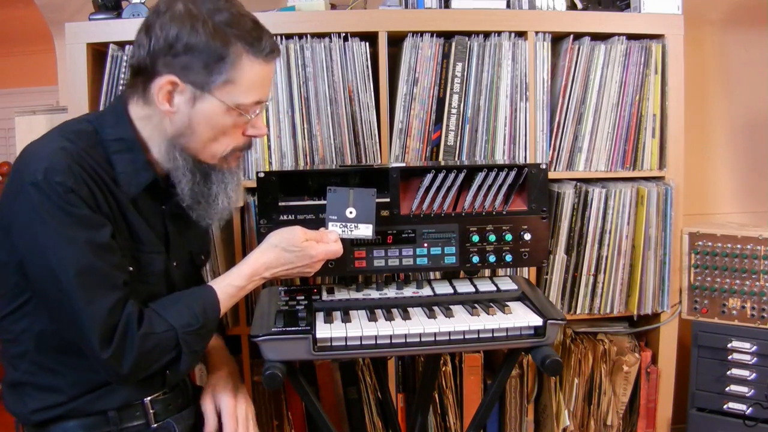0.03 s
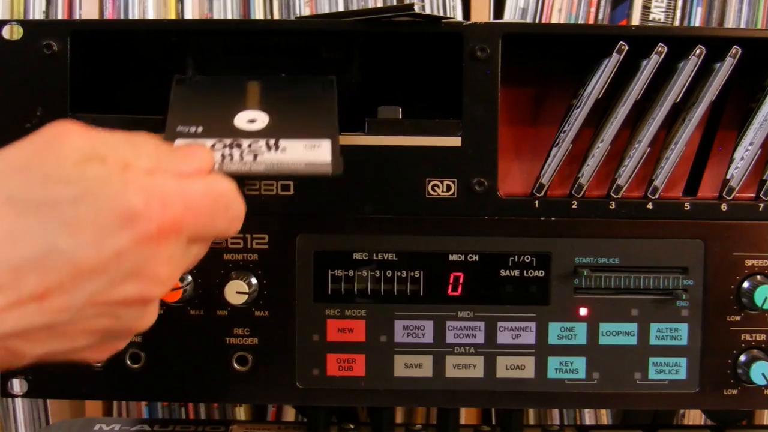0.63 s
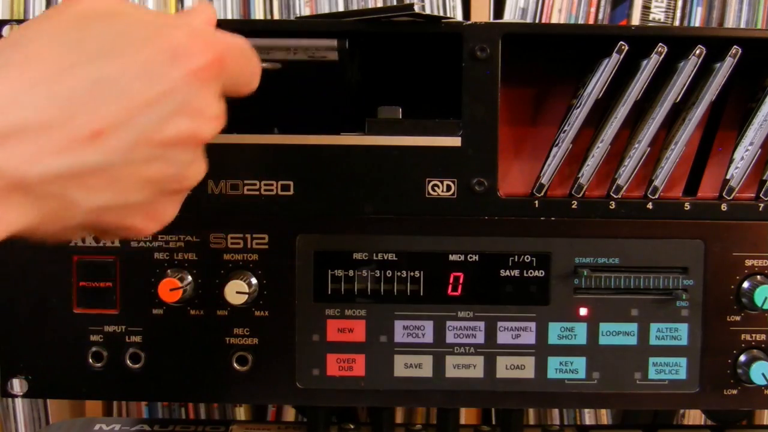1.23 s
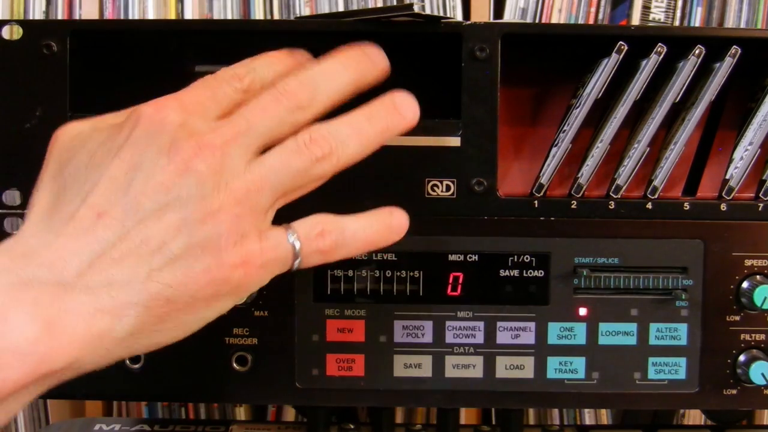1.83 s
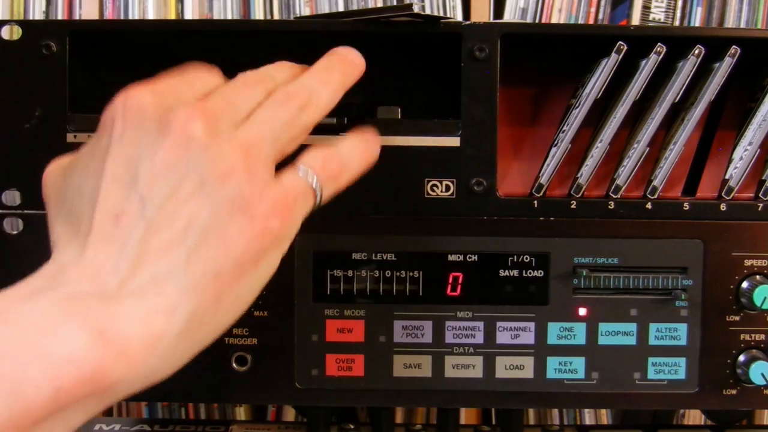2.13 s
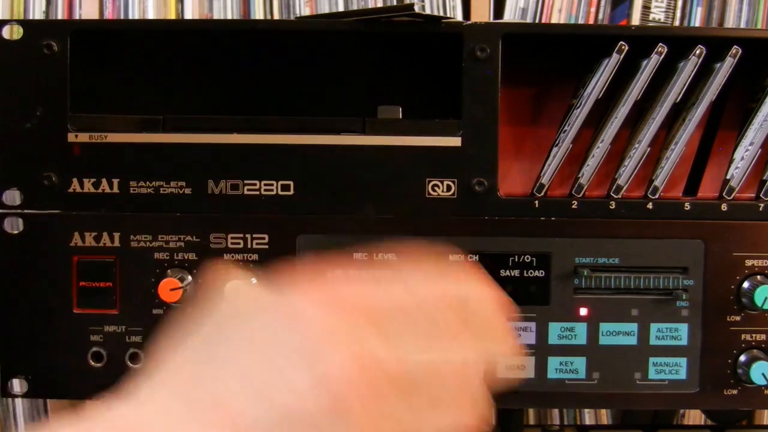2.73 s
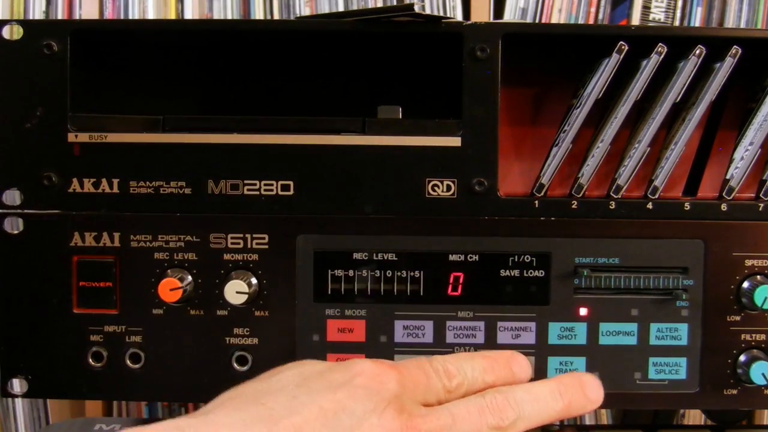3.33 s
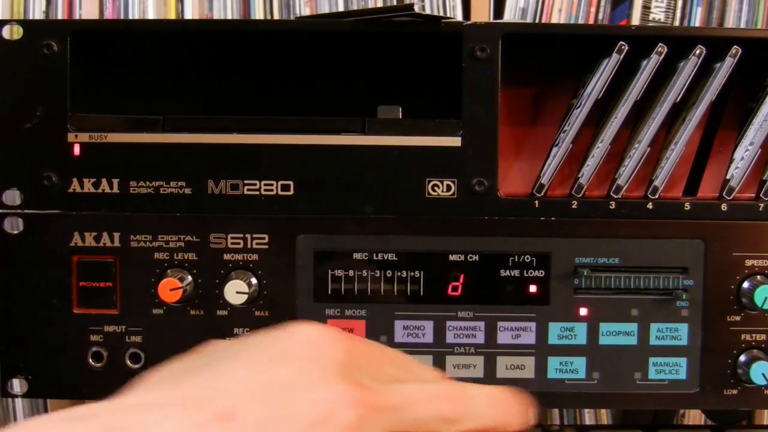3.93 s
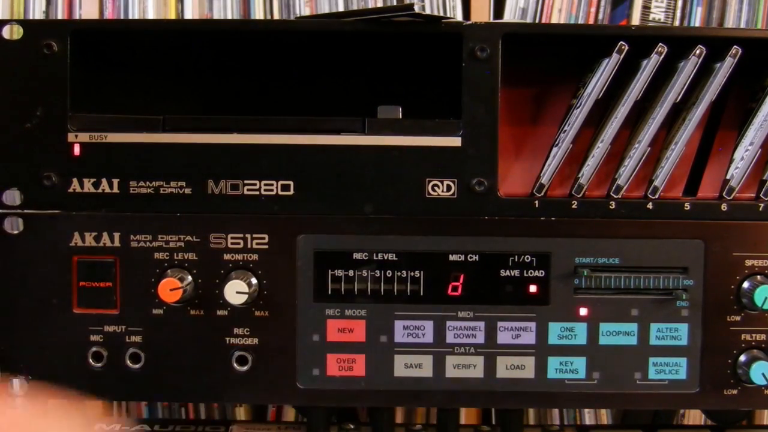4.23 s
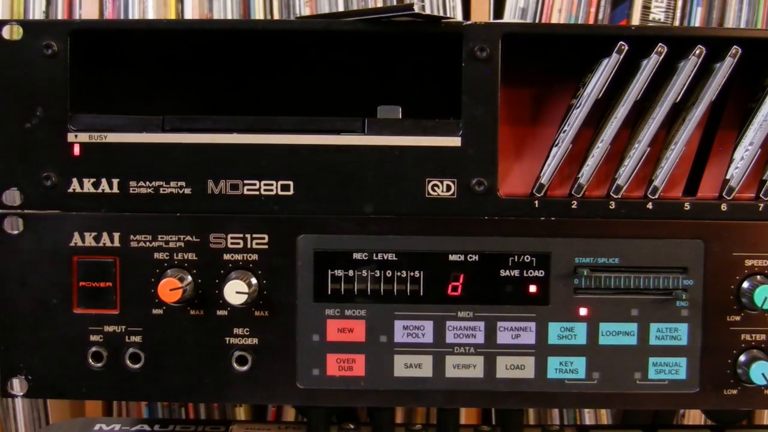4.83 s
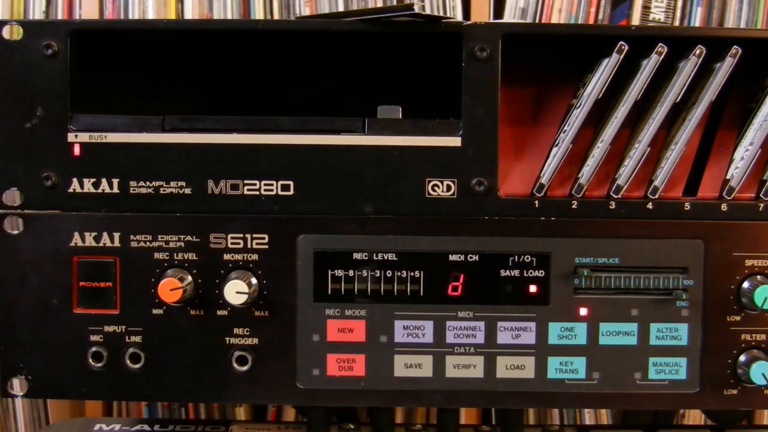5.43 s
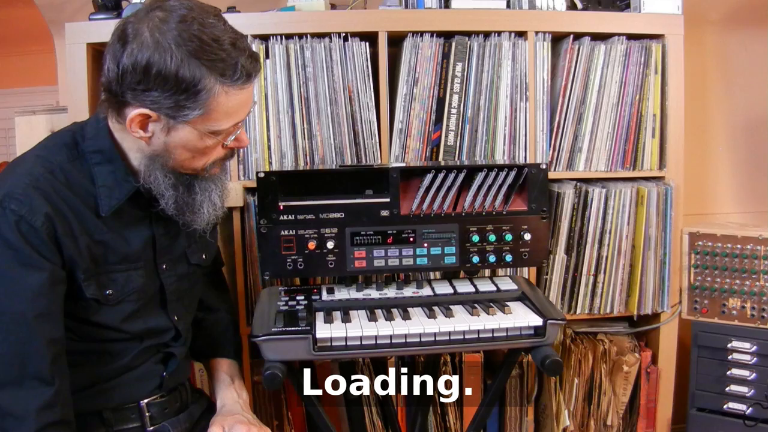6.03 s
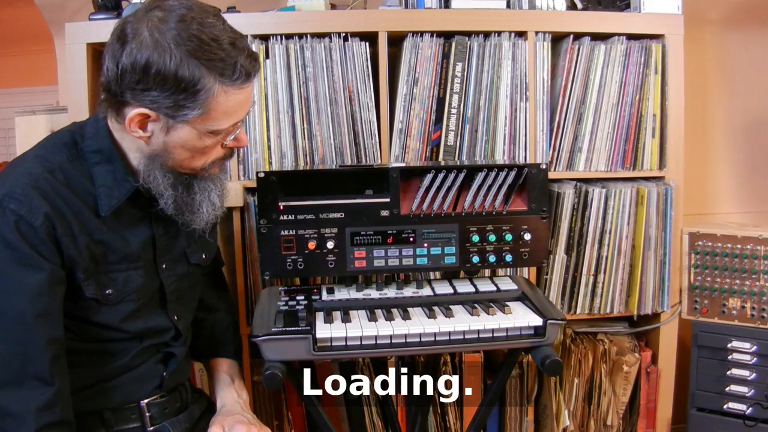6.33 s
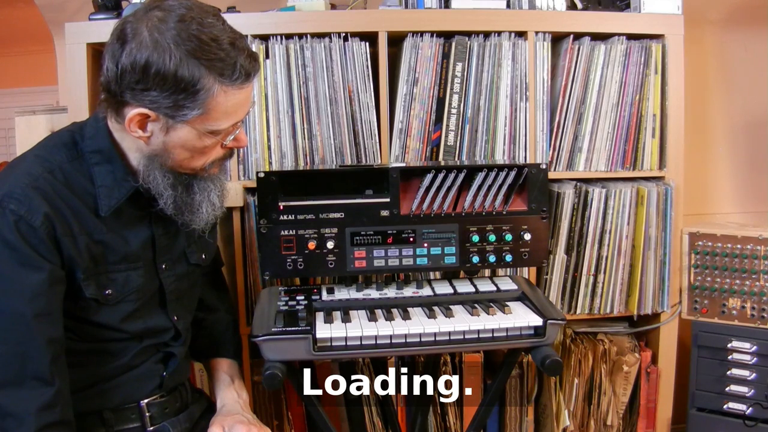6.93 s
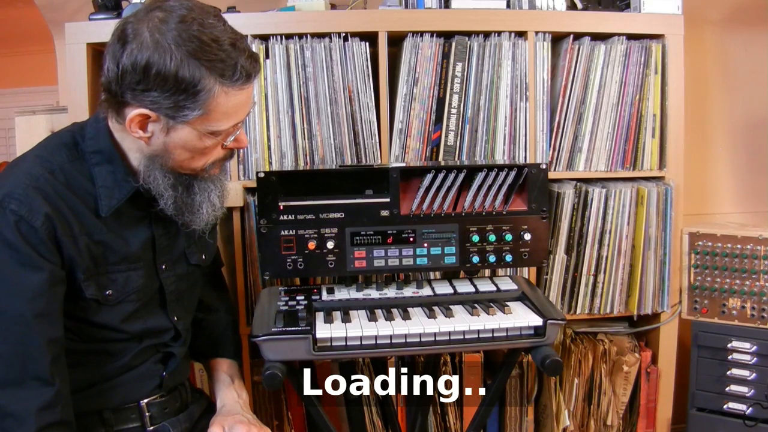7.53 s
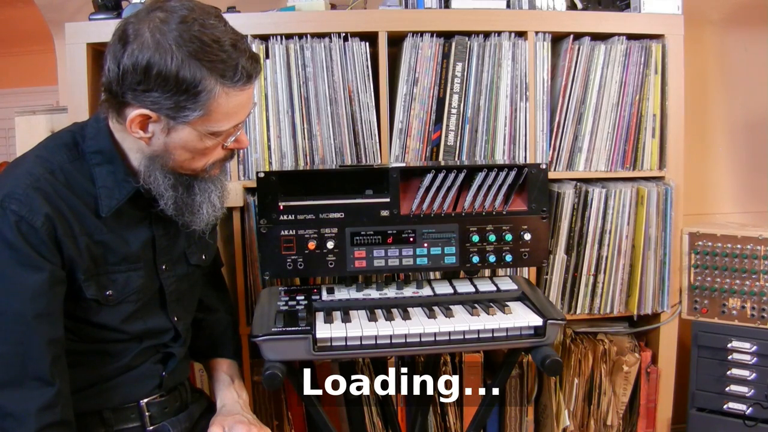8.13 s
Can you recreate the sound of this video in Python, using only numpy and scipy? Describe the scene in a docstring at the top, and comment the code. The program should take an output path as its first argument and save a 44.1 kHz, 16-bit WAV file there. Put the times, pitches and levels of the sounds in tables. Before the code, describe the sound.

A sleeve rustles softly in a quiet, dry room with a low rumble. From about 0.9 seconds a small plastic disk knocks into a drive, scraping briefly along its guides until 1.5, then is nudged home with light taps until 2. Each knock rings faintly in the steel case. The lid rattles against its latch and shuts at 2.4 with a sharp, bright snap, the loudest sound. A button clicks at about 3.4. At 3.6 the mechanism engages with a knock and a faint belt squeak, and a small motor starts a steady, slightly fluttering whine and whir. Light ticks come between 4.4 and 5.1, then one heavy clack at 5.4. After it the whine is stronger and runs on to the end at about 8 seconds, with the low rumble swelling a little underneath.

```python
"""Disk loaded into a rack drive.

A small plastic disk slides in and is nudged home; the lid snaps shut. Each hit rings the steel case.
A key clicks; the belt-driven motor starts with a squeak and whirs on, with ticks and one heavy clack.
A sleeve rustles. Quiet, dry room with a low rumble; one microphone, gain control."""
import sys
import numpy as np
from scipy import signal
from scipy.fft import rfft, irfft
from scipy.io import wavfile

SR = 44100
rng = np.random.default_rng(int(sys.argv[2]) if len(sys.argv) > 2 else 0)


def wrap_up_sound(samples):
    """Save the sound to the file named by the first command line argument, as 16-bit audio."""
    columns = np.atleast_2d(samples).T
    # keep every value between -1 and 1, then stretch to whole-number steps
    tamed = np.clip(columns, -1, 1)
    steps = np.round(tamed * 32767).astype(np.int16)
    wavfile.write(sys.argv[1], SR, steps)


N = 360297
T = np.arange(N) / SR

# Hit tables: weight adds low thud, edge adds top snap, both re level.
# disk knocks into the slot, nudged home: t/s, level/dB, weight/dB, edge/dB, part f/Hz, thud f/Hz
DISK_HITS = [ (0.426, -60.5, 0, 0.5, 1490, 303), (0.885, -45, 4.5, -23, 2370, 324),
             (1.036, -41.5, 4, -10.5, 2410, 295.6), (1.099, -47.5, 3, -12, 2040, 474),
             (1.123, -47, 11.5, -12, 1360, 462), (1.161, -48.5, 11.5, -6, 2100, 346),
             (1.185, -40.5, 0.5, -24, 2650, 320.5), (1.300, -54, -3, 9, 4370, 243),
             (1.310, -36, -13, -11, 2370, 370), (1.326, -37.5, 2, -20, 2610, 355),
             (1.354, -37.5, -16, -7, 2890, 336), (1.371, -42.5, 4.5, -0.5, 3400, 269),
             (1.387, -43.5, 5.5, -7, 2310, 362), (1.423, -40, -1.5, -4, 2710, 302),
             (1.629, -53.5, 4, -6, 5430, 302), (1.655, -42.5, 3, -7.5, 1316, 324),
             (1.672, -43.5, 6, -11, 1597, 309), (1.784, -42.5, 8.5, -2.5, 2080, 307),
             (1.899, -44, 6.5, -6, 2340, 296), (1.990, -45, 0.5, 2.5, 2090, 302.3),
             (2.019, -46, 5, -2.5, 2690, 315)]
# lid meets latch, shuts, settles: t/s, level/dB, weight/dB, edge/dB, part f/Hz, rattle t60/s
LATCH_HITS = [ (2.323, -56.5, -9, -4, 3180, 0.056), (2.339, -45.5, -13, 1, 3090, .07),
              (2.347, -33.5, -9.5, -4, 2740, .045), (2.356, -43.5, 1, -20, 1480, 0.072),
              (2.416, -46.5, -1, -3, 4700, 0.069), (2.432, -22, -11, -2, 5030, .12),
              (2.594, -48, 5.5, -10, 2360, 0.3)]
# key pressed, then released: t/s, level/dB, weight/dB, edge/dB, part f/Hz, rattle t60/s
KEY_HITS = [(3.228, -52, -7, -16, 1640, 0.018), (3.408, -42.5, -9.5, -9, 3770, 0.077)]
# mechanism engages, shifts: t/s, level/dB, weight/dB, edge/dB, part f/Hz, thud f/Hz
MECHANISM_HITS = [ (3.577, -42, -3.5, -11, 2760, 480), (4.446, -41, -3, -17, 1980, 317),
                  (4.467, -42.5, -0.5, -14, 1740, 252), (4.758, -47.5, 1.5, -7, 1780, 309),
                  (5.025, -44.5, -2.5, -15, 1730, 320), (5.062, -43, -14, -8, 2220, 300),
                  (5.137, -57, 12.5, -18, 1313, 290), (5.397, -30.5, 4.5, -7, 1600, 236),
                  (5.418, -35.5, -7, -15, 1680, 232), (6.035, -57, 2, -6, 1400, 257.8)]
# modes of steel case and lid, unmuted: f/Hz, energy/dB, t60/s
CASE_MODES = [(154.4, -27.5, 1.3), (240.5, -18, 0.37), (300, -9.5, 0.12), (359, -17.5, 0.2),
              (481.3, -21.5, 0.3), (600, -19, 0.27), (886.4, -12, 0.11), (1123, -18.5, 0.11),
              (1580, -36, 0.22), (1656, -51, 0.19), (2066, -11.5, 0.14), (2251, -9, 0.12),
              (2534, -18, 0.048), (2970, -48, 0.2), (4430, -32, 0.12), (4700, -23, .15), (4980, -18, 0.13),
              (4880, -17.5, 0.052), (7070, -24, .2), (7370, -23, 0.21)]
# edges of the thud, knock, clack and snap bands: f/Hz
HIT_BANDS_HZ = [130, 400, 1500, 6000, 16000]
# motor spins up, runs, drags the mechanism, runs free:
# start t/s, whine f/Hz, whine level/dB, flutter/dB, drone level/dB, whir level/dB, belt f/Hz
MOTOR_STAGES = [ (3.579, 902, -55.5, 5, -49.5, -49.5, 1730), (3.74, 893.6, -52.5, 4, -57, -50, 1344),
                (4.45, 885, -62.5, 5.5, -55, -49, 1345), (5.47, 884.3, -46.5, 2.2, -51, -50, 1413)]
# gear and belt tones at nominal speed: f/Hz, level/dB re whine
GEAR_TONES = [(479, -9.5), (549, -20), (732, -31), (770, -34), (1287, -28), (1367, -11), (1421, -17.5),
              (1453, -20), (1658, -22), (1764, -19.5)]
# disk in its guides: t/s, rub level/dB, scratch level/dB
SLIDE_LEVELS = [(1.04, -53, -52), (1.07, -40, -48), (1.11, -44, -53), (1.135, -33, -48), (1.19, -45, -59),
                (1.26, -40.5, -48), (1.32, -44.5, -44), (1.42, -44, -54), (1.49, -60, -80)]
# arm moves: middle t/s, length/s, level/dB
SLEEVE_MOVES = [(0.03, 0.67, -52.5), (.38, 0.28, -52), (1.3, 2.1, -62), (2.173, 0.38, -52.5),
                (2.9, 0.81, -54.5), (4.5, 1.18, -51)]
# noise shapes: f/Hz, relative density/dB
RATTLE_SPECTRUM = [(100, 1.5), (300, -28), (420, -5), (1000, -6), (2800, 0.5), (5000, -6.5), (7000, -14),
                   (10000, -16), (13000, -17.5), (16000, -29)]
DRONE_SPECTRUM = [(60, -16), (110, -9.5), (250, 2), (330, 0), (400, -5), (450, -6), (495, 6.5), (530, -3),
                  (800, -6), (1100, -10.5), (2000, -43)]
WHIR_SPECTRUM = [(500, -9), (1000, -7), (1300, -1.5), (1700, -3), (2100, -6.5), (2900, -10), (3800, -18),
                 (5200, -30), (6000, -25), (10500, -29), (15000, -42)]
BEARING_SPECTRUM = [(3000, -19), (4000, -17), (4400, -0.5), (4580, -3), (4800, -7), (5200, -7.5),
                    (6000, -24)]
RUB_SPECTRUM = [(88, -41), (150, -31), (208, -11), (295, 6), (409, -9), (463, 3), (634, -7), (867, -3),
                (959, -16), (1190, -4), (1470, -19), (2710, -17), (3000, -37), (3900, -57), (6600, -120)]
SCRATCH_SPECTRUM = [(710, -33), (1200, 8), (1320, -11), (2710, 2), (3180, -12), (7570, -19), (9010, -13),
                    (12900, -24), (16000, -36)]
CLOTH_SPECTRUM = [(60, 4.5), (150, 2), (350, -1.5), (700, -11), (2500, -18.5), (5000, -23.5),
                  (12000, -28.5), (16000, -30)]
AIR_SPECTRUM = [(20, -41), (45, -11), (70, -17), (90, -26), (120, -20.5), (146, -27.5), (200, -34.5),
                (286, -32), (469, -39.5), (1500, -45.5), (5000, -52.5), (7500, -53), (13000, -55),
                (16000, -59)]
RUMBLE_SPECTRUM = [(10, -2.5), (22, 10), (35, -5), (50, -6.5), (80, -18), (160, -65)]
# room rumble: t/s, level/dB
RUMBLE_LEVELS = [(0, -38.5), (.6, -40.5), (2, -41.5), (5.3, -40.5), (5.65, -49.5), (6.15, -36),
                 (6.8, -43.5), (7.5, -36), (8.17, -35)]
# room hums: f/Hz, level/dB
ROOM_HUMS = [(47, -53), (119.9, -65), (7350, -85.5)]
# low gliding tones: start t/s, length/s, f/Hz, glide/(Hz/s), level/dB
LOW_GLIDES = [(6.005, 1.62, 40.42, -3.1, -36), (7.254, .3, 180.4, 17, -57), (7.755, .6, 172.5, 18, -52.5)]
# room decay: f/Hz, t60/s
ROOM_DECAY = [(100, 1), (250, 0.4), (500, 0.69), (1000, 0.46), (4000, 0.35), (8000, 0.32), (16000, 0.16)]


def hit(rattle, level_db, weight_db, edge_db, part_hz, thud_hz, rattle_t60_s, rise_s, knock_db, case_db,
        thud_db=-16, thud_t60_s=0.13, part_db=-12, part_t60_s=0.051, spread=0.031, snap_t60_s=0.045):
    """Contact burst, low thud, three close modes of the struck part and the case, levelled by band."""
    t = T[:SR]
    burst = contact(rattle) * amp(-60 * t / max(rattle_t60_s, .004))
    part = sum(ring(part_hz * (1 + spread * k), part_t60_s, t) for k in (-1, 0, 1)) / np.sqrt(3)
    thud = ring(thud_hz, thud_t60_s, t)
    sound = burst / np.linalg.norm(burst) + amp(thud_db) * thud + amp(part_db) * part
    t60_scale = amp(min(case_db, 0) / 2)  # a muted case rings shorter
    for hz, db, t60_s in CASE_MODES:
        strike_place_db = 2 * rng.standard_normal()
        sound += amp(case_db + db + strike_place_db) * ring(hz, t60_s * t60_scale, t)
    sound *= 1 - np.exp(-t / rise_s)
    filters = [signal.butter(3, HIT_BANDS_HZ[k:k + 2], "bandpass", fs=SR, output="sos") for k in range(4)]
    bands = [signal.sosfilt(sos, sound) for sos in filters]
    bands[-1] *= amp(-60 * t / snap_t60_s)  # the top dies first
    onset_db = level_db + np.array([weight_db, weight_db / 2 + knock_db, 0, edge_db])  # first 20 ms
    return sum(amp(db) * band / band[:SR // 50].std() for db, band in zip(onset_db, bands))


def contact(rattle):
    """A random second of contact noise."""
    return rattle[rng.integers(N - SR):][:SR]


def disk_taps(rattle):
    """The disk knocks against the slot."""
    return sum(at(s, hit(rattle, *row, rattle_t60_s=0.047, rise_s=0.0019, knock_db=-1.5, case_db=-4.5,
                         thud_db=-12.5, thud_t60_s=0.27, part_db=-6))
               for s, *row in DISK_HITS)


def lid_snap(rattle):
    """The lid strikes its latch."""
    return sum(at(s, hit(rattle, *row, thud_hz=295.5, rattle_t60_s=t60_s, rise_s=0.0026,
                         knock_db=-0.5, case_db=-4, part_db=-10.5))
               for s, *row, t60_s in LATCH_HITS)


def key_clicks(rattle):
    """A panel key clicks; the case rings faintly."""
    return sum(at(s, hit(rattle, *row, thud_hz=420, rattle_t60_s=t60_s, rise_s=0.065 * t60_s,
                         knock_db=-1.5, case_db=-9))
               for s, *row, t60_s in KEY_HITS)


def mechanism_clacks(rattle):
    """Drive parts knock as they engage and shift."""
    return sum(at(s, hit(rattle, *row, rattle_t60_s=.07, rise_s=0.0038, knock_db=1.0, case_db=-5.5,
                         thud_db=-12.5, thud_t60_s=0.088, part_db=-11.5))
               for s, *row in MECHANISM_HITS)


def brushes(rattle, lead_s=0.011, re_hit_db=-14.5):
    """Disk, key and drive parts brush just before they hit."""
    swell = np.linspace(0, 1, round(lead_s * SR)) ** .5
    return sum(at(s - lead_s, amp(db + re_hit_db) * swell * contact(rattle)[:len(swell)])
               for s, db, *_ in DISK_HITS + KEY_HITS + MECHANISM_HITS)


def motor(nominal_whine_hz=882, nominal_disk_hz=6.86, wow=0.0035):
    """Whine, gear tones, frame drone and whir; speed and load sway once a disk turn."""
    whine_hz, whine_db, flutter_db, drone_db, whir_db, belt_hz = motor_controls()
    stage_speed = whine_hz / nominal_whine_hz
    disk_rad = angle(nominal_disk_hz * stage_speed)
    speed = stage_speed * (1 + wow * np.sin(disk_rad) + .001 * drift(40) + .0015 * drift(4))
    tones = tone(nominal_whine_hz * speed, whine_db + flutter_db * np.tanh(drift(25)))
    turn_db = 4 * np.sin(disk_rad) + 1.3 * np.cos(4 * disk_rad)  # one swell, four ripples a turn
    for hz, db in GEAR_TONES:
        swell_db = (hz > nominal_whine_hz) * turn_db + 1.2 * drift(16)
        tones += tone(hz * speed * (1 + .002 * drift(20)), whine_db + db + swell_db)
    whir = amp(whir_db) * belt_and_bearing(disk_rad, speed, belt_hz)
    drone = amp(drone_db) * noise(DRONE_SPECTRUM)
    return (T > MOTOR_STAGES[0][0]) * (tones + drone + whir)


def motor_controls(settle_s=0.0493):
    """Per-sample settings; each stage eases into the next."""
    starts_s, *columns = np.transpose(MOTOR_STAGES)
    stage = np.maximum(np.searchsorted(starts_s, T) - 1, 0)
    pole = np.exp(-1 / (settle_s * SR))
    return [c[0] + signal.lfilter([1 - pole], [1, -pole], c[stage] - c[0]) for c in columns]


def belt_and_bearing(disk_rad, speed, belt_hz, shaft_hz=54.4, pole_hz=237.8, bearing_hz=4598):
    """Resonant belt and bearing noise, chopped by shaft and poles (rates at speed 1)."""
    sway = .14 * np.sin(disk_rad) + .1 * np.sin(2 * disk_rad + 1) + .13 * np.sin(3 * disk_rad)
    chop = unit(1 + sway + .2 * np.sin(angle(shaft_hz * speed)) + .17 * np.sin(angle(pole_hz * speed)))
    throb = unit(amp(1.5 * np.sin(disk_rad)))
    belt = throb * resonant_noise(belt_hz * (1 - 0.034 * np.cos(disk_rad)), width_hz=270)
    rasp_hz = bearing_hz * (1 + .006 * np.sin(disk_rad)) * (belt_hz / belt_hz[-1]) ** .2
    bearing = unit(resonant_noise(rasp_hz, width_hz=300) + noise(BEARING_SPECTRUM))
    whir = amp(-3) * noise(WHIR_SPECTRUM) + amp(-4.5) * belt
    return whir * (1 + chop) / 2 + amp(-10.5) * bearing * chop


def belt_squeak(start_s=3.602, length_s=0.053, start_hz=4850, fall_hz_per_s=25000, level_db=-55):
    """The belt slips as it takes up the load: a rough falling chirp."""
    hz = start_hz - fall_hz_per_s * np.clip(T - start_s, 0, length_s)
    phase = angle(hz * (1 + .012 * drift(700)))
    swell = arch(start_s + length_s / 2, length_s) ** 2
    return amp(level_db) * swell * (np.sin(phase) + np.sin(2 * phase) + 0.83 * np.sin(3 * phase))


def disk_slide(catch_db=4.0, catch_hz=500):
    """Plastic catches and slips along the guides."""
    rub_db, scratch_db = curves(SLIDE_LEVELS)
    sliding = (T > SLIDE_LEVELS[0][0]) & (T < SLIDE_LEVELS[-1][0])
    slips = unit(amp(catch_db * drift(catch_hz)))
    friction = amp(rub_db) * noise(RUB_SPECTRUM) + amp(scratch_db) * noise(SCRATCH_SPECTRUM)
    return sliding * slips * friction


def sleeve(grain_db=1.5):
    """Cloth rustles, loudest midway through each arm move."""
    swell = sum(amp(db) * arch(middle_s, length_s) for middle_s, length_s, db in SLEEVE_MOVES)
    return swell * amp(grain_db * drift(120)) * noise(CLOTH_SPECTRUM)


def reflections(x, build_s=0.0031):
    """Diffuse room tail; each band has its own decay."""
    taps = rng.standard_normal(SR) * (1 - np.exp(-(T[:SR] / build_s) ** 2))
    hz, t, spectra = signal.stft(taps, SR, nperseg=256)
    decay = amp(-60 * t / at_hz(ROOM_DECAY, hz)[:, None])
    tail = signal.istft(spectra * decay, SR, nperseg=256)[1]
    return signal.fftconvolve(x, tail / np.linalg.norm(tail))[:N]


def background(air_db=-52):
    """Room air, wavering hums, rumble and low tones."""
    hums = sum(tone(hz * (1 + 0.0017 * drift(30)), db + 3.1 * drift(7.6)) for hz, db in ROOM_HUMS)
    rumble = amp(curves(RUMBLE_LEVELS)[0]) * noise(RUMBLE_SPECTRUM)
    air = amp(air_db) * noise(AIR_SPECTRUM)
    return air + hums + rumble + sum(low_tone(*row) for row in LOW_GLIDES)


def low_tone(start_s, length_s, hz, glide_hz_per_s, db, fade_s=0.17, waver_db=1.5):
    """Fades in, glides, fades out."""
    t = np.clip(T - start_s, 0, length_s)
    fade = np.minimum(np.minimum(t, length_s - t) / fade_s, 1)
    return fade * tone(hz + glide_hz_per_s * t, db + waver_db * drift(6))


def amp(db):
    """dB to gain."""
    return 10 ** (np.asarray(db) / 20)


def unit(x):
    """Scale to rms 1."""
    return x / np.sqrt(np.mean(x ** 2) + 1e-20)


def at(start_s, sound):
    """Sound placed on a silent track."""
    track = np.zeros(N)
    span = track[round(start_s * SR):][:len(sound)]
    span += sound[:len(span)]
    return track


def at_hz(table, hz):
    """Table lookup, log frequency."""
    f, value = np.transpose(table)
    return np.interp(np.log(hz + 1), np.log(f + 1), value)


def curves(table):
    """Time table to per-sample columns."""
    s, *columns = np.transpose(table)
    return [np.interp(T, s, c) for c in columns]


def noise(spectrum):
    """Shaped noise, rms 1."""
    gain = amp(at_hz(spectrum, np.fft.rfftfreq(N, 1 / SR)))
    return unit(irfft(rfft(rng.standard_normal(N)) * gain, N))


def resonant_noise(hz, width_hz):
    """Noise through a moving resonance, rms 1."""
    white = rng.standard_normal(N)
    carrier = np.exp(1j * angle(hz))
    r = np.exp(-np.pi * width_hz / SR)
    return unit((carrier * signal.lfilter([1], [1, -2 * r, r * r], white / carrier)).real)


def drift(rate_hz):
    """Random wander, rms 1."""
    knots_s = np.arange(0, T[-1] + 1, 1 / rate_hz)
    return unit(np.interp(T, knots_s, rng.standard_normal(len(knots_s))))


def angle(hz):
    """Running phase/rad, random start."""
    return 2 * np.pi * (np.cumsum(hz * np.ones(N)) / SR + rng.random())


def tone(hz, rms_db):
    """Sine following pitch and level."""
    return np.sqrt(2) * amp(rms_db) * np.sin(angle(hz))


def ring(hz, t60_s, t):
    """Decaying mode, energy 1."""
    mode = np.sin(2 * np.pi * (hz * t + rng.random())) * amp(-60 * t / t60_s)
    return mode / np.linalg.norm(mode)


def arch(middle_s, length_s):
    """Half-cosine swell, peak 1."""
    return np.cos(np.pi * np.clip((T - middle_s) / length_s, -.5, .5))


def scene(wet_db=-7):
    """Mono mix on two channels; hits, slide and squeak excite the room."""
    rattle = noise(RATTLE_SPECTRUM)
    hits = disk_taps(rattle) + lid_snap(rattle) + key_clicks(rattle) + mechanism_clacks(rattle)
    events = hits + brushes(rattle) + disk_slide() + belt_squeak()
    mono = events + amp(wet_db) * reflections(events) + sleeve() + motor() + background()
    return np.array([mono, mono])


def record(dry, threshold_db=-28, duck_db_per_db=0.28, recovery_db_per_s=14, cutoff_hz=15900):
    """Gain control ducks after the loudest hits; then a low-pass."""
    power = signal.lfilter([1 / 900], [1, 1 / 900 - 1], dry[0] ** 2)  # 20 ms average
    level_db = 10 * np.log10(power + 1e-12)
    held_db = np.maximum.accumulate(level_db + recovery_db_per_s * T) - recovery_db_per_s * T
    ducked = dry / amp(duck_db_per_db * np.maximum(held_db - threshold_db, 0))
    lowpass = signal.firwin(511, cutoff_hz, window=("kaiser", 9), fs=SR)
    return signal.oaconvolve(ducked, lowpass[None], "same")


dry = scene()
out = record(dry)
wrap_up_sound(out)
```